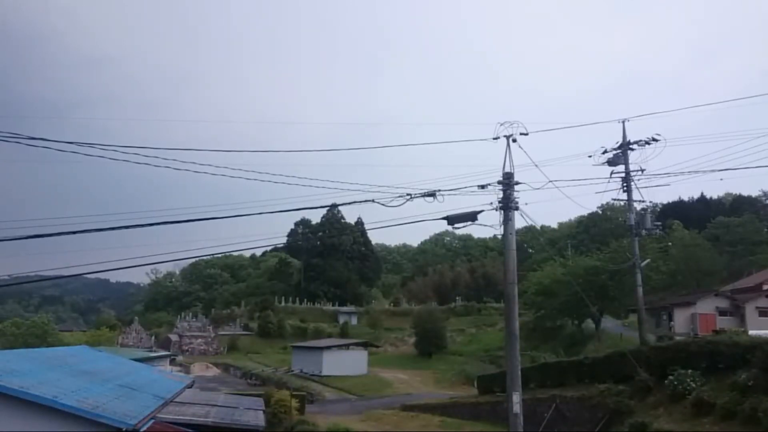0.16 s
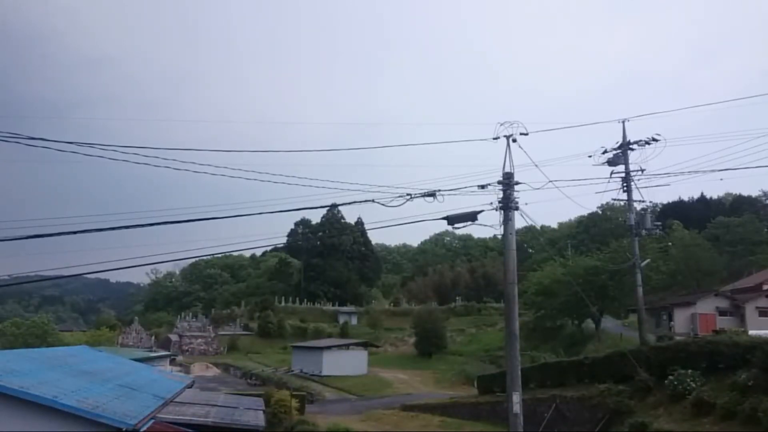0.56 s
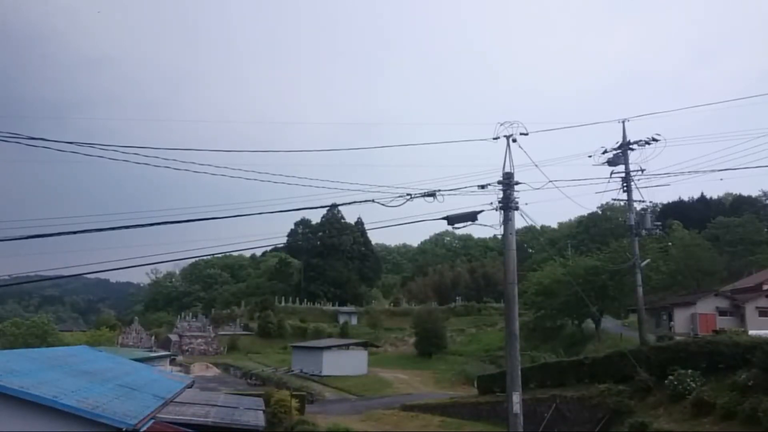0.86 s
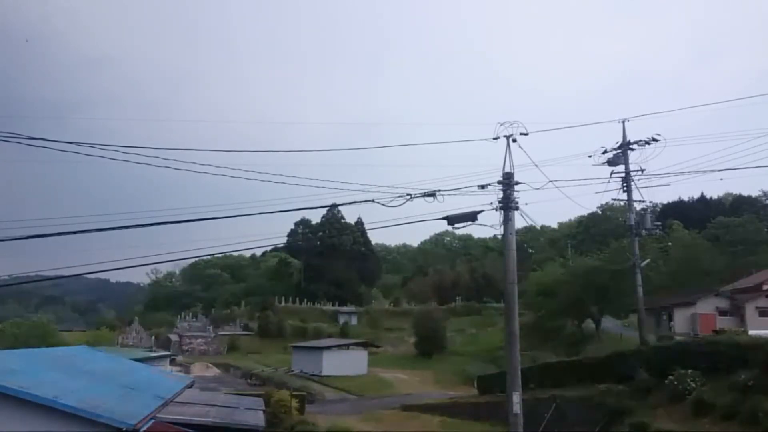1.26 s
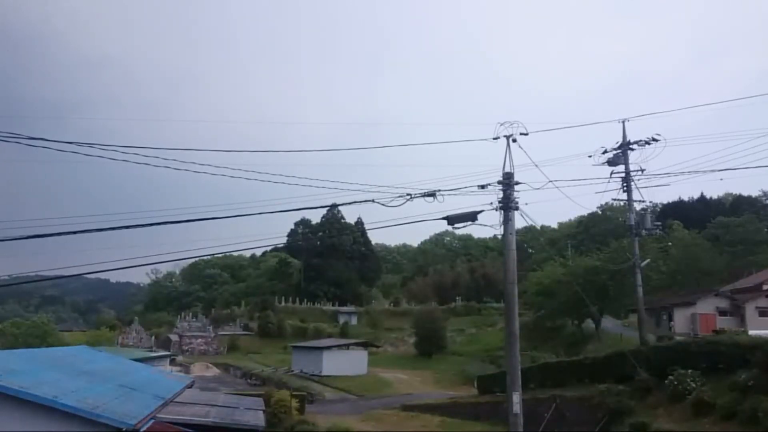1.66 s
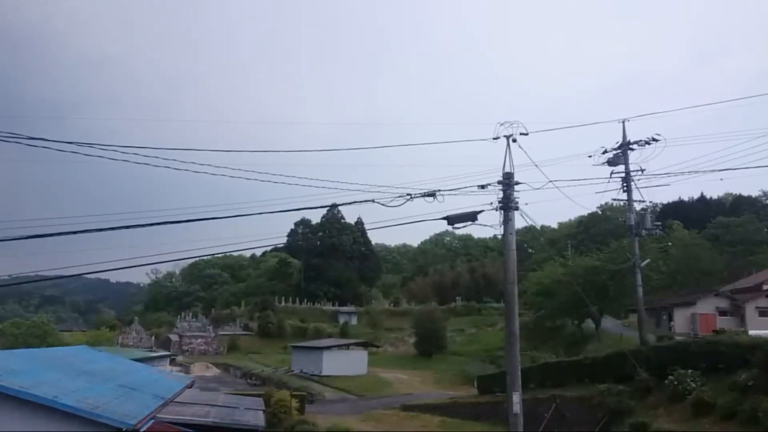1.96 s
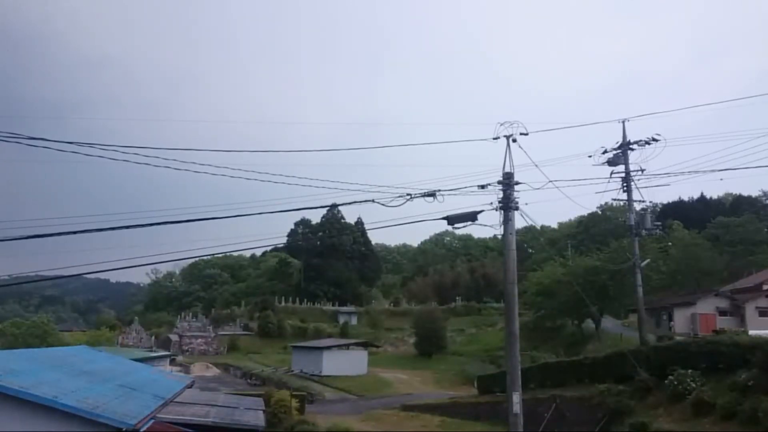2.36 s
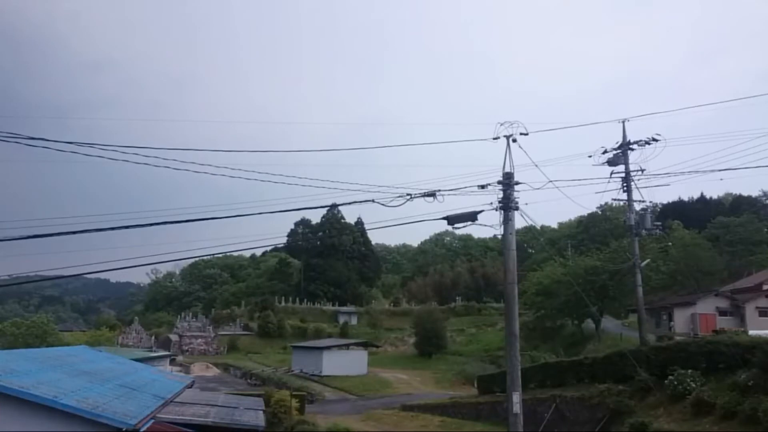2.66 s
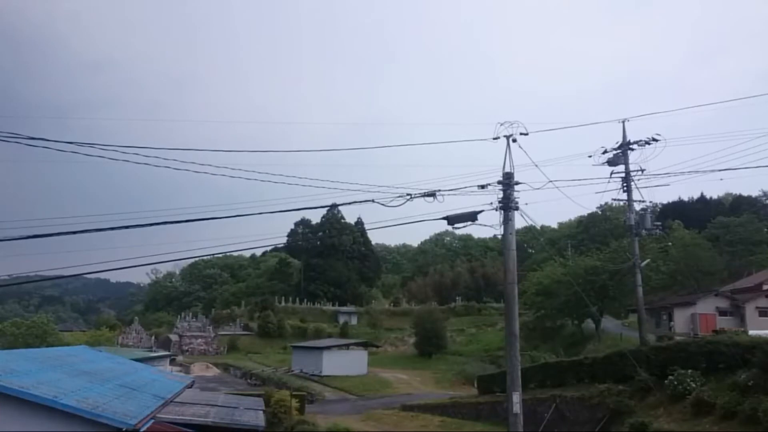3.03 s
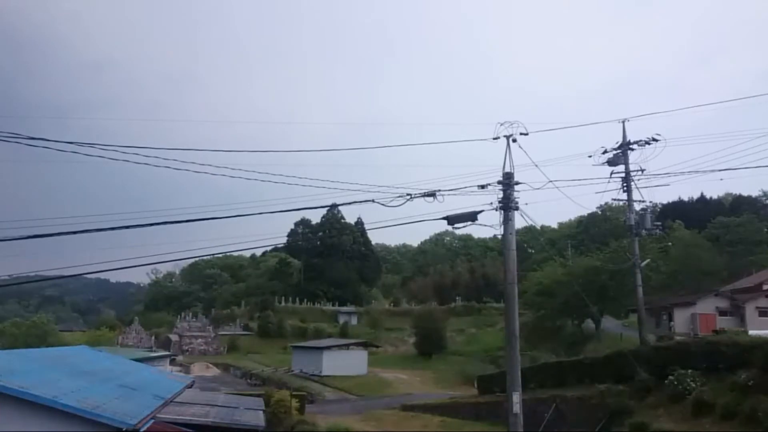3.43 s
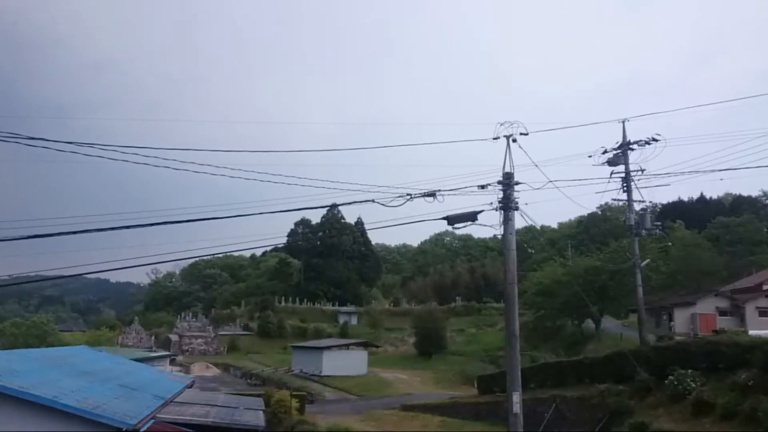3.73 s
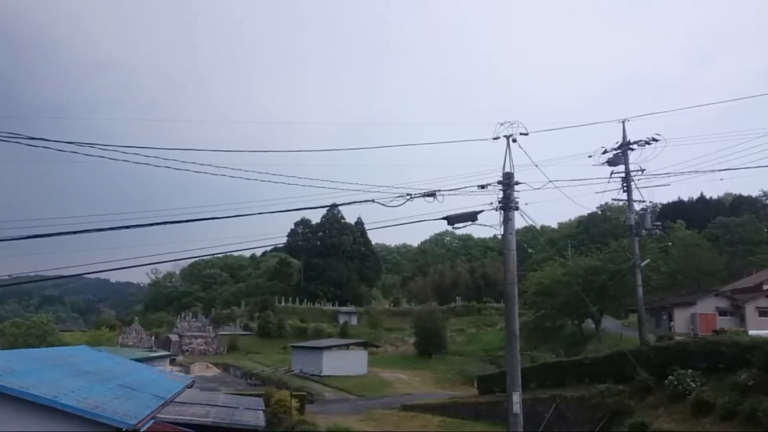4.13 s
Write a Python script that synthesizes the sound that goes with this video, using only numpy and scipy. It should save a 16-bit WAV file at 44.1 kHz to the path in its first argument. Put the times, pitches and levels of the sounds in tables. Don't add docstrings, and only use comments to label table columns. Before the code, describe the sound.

Still, nearly silent outdoor air opens the scene. At about 0.36 seconds thunder strikes abruptly: a hard, low-mid blast with a brief bright snap and a tiny buzzing rattle of something loose nearby. Uneven booms tumble on over a dense deep rumble, with another knock near 0.8, easing around 1.2. At 1.5 a second powerful burst hits, with crackling edges and crowded thuds until about 2.1, and another boom near 2.4. The roll then softens into muffled hill echoes, thinning after 3.3. A last, smaller surge arrives at 3.8 and fades until the abrupt end at about 4.3. Much quieter and close by, a sandal slides over grit, strongest near 1.5, squeaks faintly around 2.0 and 2.4 to 2.8, steps softly at 2.8, and crunches firmly twice with a stone tick around 3.8. No rain; mono phone sound, overloaded peaks gently held, little deepest bass.

```python
import sys
import numpy as np
from scipy import signal
from scipy.fft import rfft, irfft, next_fast_len
from scipy.io import wavfile
from scipy.ndimage import uniform_filter1d, minimum_filter1d

SR = 44100
rng = np.random.default_rng(int(sys.argv[2]) if len(sys.argv) > 2 else 0)


def ratio(d):
    e = np.asarray(d, float) / 20
    return 10 ** e


def transcribe(u):
    v = np.clip(np.atleast_2d(u).T, -1, 1)
    q = np.round(v * 32767).astype(np.int16)
    wavfile.write(sys.argv[1], SR, q)


N = 189365

# time in seconds, level in dB,
# nearness in dB (near segments sound brighter, far ones deeper).
ROLL_COURSE = [(0, -93, 5), (.24, -75, 14.5), (.27, -58.5, 22), (.31, -43.5, 9.5), (.36, -25.5, 3),
               (.6, -31.5, 1.5), (.97, -31, 3), (1.21, -36.5, 8), (1.51, -30, 1), (1.6, -27, 0),
               (2.05, -26, -1), (2.27, -30.5, 0.5), (2.8, -31.5, -1), (3.26, -28.5, 0), (3.34, -37, 2),
               (3.764, -42, 3), (3.781, -25.5, -3.5), (4.29, -37, 0)]


def rms_one(x):
    return x / np.sqrt(np.mean(x ** 2) + 1e-20)


def in_time(rows):
    s, *columns = np.transpose(rows)
    return [np.interp(np.arange(N) / SR, s, c) for c in columns]


def filtered(x, points):
    hz, level_db = np.transpose(points)
    size = next_fast_len(N + SR // 4)
    grid = np.maximum(np.fft.rfftfreq(size, 1 / SR), 1)
    response = ratio(np.interp(np.log(grid), np.log(hz), level_db))
    return irfft(rfft(x, size) * response, size)[..., :N]


def coloured(x, points):
    return rms_one(filtered(x, points))


def grains(per_s, spread_db):
    sizes = ratio(spread_db * np.minimum(rng.exponential(1, N), 4))
    signs = rng.choice([-1, 1], N)
    return sizes * signs * (rng.random(N) < per_s / SR)


def drift(rate):
    knots = rng.standard_normal(400)
    return np.interp(np.arange(N) / SR * rate, np.arange(400), knots)


def packets(rows, skew, fall):
    out = np.zeros(N)
    for s, level_db, hz, half_ms in rows:
        t = np.arange(-4 * half_ms, 6 * half_ms, 1000 / SR) / half_ms
        shape = np.exp(-.5 * (t / np.where(t < 0, 1 - skew, 1 + skew)) ** 2)
        cycles = hz * half_ms / 1000 * (t - fall * t ** 2 / 2)
        wave = ratio(level_db) * shape * np.sin(2 * np.pi * (cycles + rng.random()))
        at = round((s - half_ms / 250) * SR)
        out[at:at + len(t)] += wave[:N - at]
    return out


def bursts(rows):
    out = np.zeros(N)
    t = np.arange(SR // 4) / SR
    for s, level_db, hz, octaves, rise_ms, t60 in rows:
        edges = np.clip(hz * 2. ** (octaves * np.array([-.5, .5])), 20, 18000)
        band_pass = signal.butter(2, edges, "band", fs=SR, output="sos")
        band = rms_one(signal.sosfilt(band_pass, rng.laplace(size=len(t))))
        shape = (1 - np.exp(-(1000 * t / rise_ms) ** 2)) * ratio(-60 * t / t60)
        at = round(s * SR)
        out[at:at + len(t)] += (ratio(level_db) * band * shape / shape.max())[:N - at]
    return out


def thunder_booms():
    # time in seconds, peak in dB, pitch in Hz.
    kinks = [(0.365, -4.5, 196.3), (.376, -1.0, 249), (.388, -8, 268), (0.397, -10, 224.6),
             (0.477, -8.5, 207.5), (.551, -15, 160.5), (.681, -12, 227), (.797, -10, 174.6),
             (.854, -7.5, 214), (.934, -14, 148), (1.328, -13, 157), (1.354, -12, 149), (1.535, -2.5, 230),
             (1.552, -7.5, 208.4), (1.573, -9.5, 206.6), (1.631, -7, 230.5), (1.74, -5, 199),
             (1.842, -10.5, 167), (1.861, -10, 183.6), (1.88, -9.5, 182), (1.905, -8.5, 231.5),
             (1.941, -12, 265), (2.0, -8.5, 161.8), (2.013, -8.5, 202), (2.055, -14.5, 217),
             (2.116, -7.5, 191.6), (2.371, -10.5, 155.5), (2.383, -9.5, 249), (3.779, -11, 221),
             (3.928, -8.5, 256)]
    # time in seconds,
    # peak in dB, pitch in Hz.
    echoes = [(.359, -16.5, 293), (.37, -11, 425), (.398, -12, 433), (.444, -14, 278), (.546, -11.5, 374),
              (.82, -21, 205), (1.381, -15.5, 252), (1.96, -13, 213), (2.027, -15, 182),
              (2.324, -16.5, 198.4), (2.6, -20, 239), (2.649, -19, 231), (2.667, -16.5, 270),
              (2.7, -20, 245), (2.794, -17.5, 158), (2.819, -23, 183), (2.872, -14, 220),
              (2.899, -19.5, 256), (2.986, -21.5, 210), (2.999, -16, 170), (3.121, -17.5, 207.4),
              (3.169, -28, 228), (3.203, -20.5, 247), (3.239, -17.5, 198), (3.258, -19, 232),
              (3.424, -24, 110.5), (3.912, -12.5, 232), (4.026, -19.5, 199), (4.05, -20, 147),
              (4.076, -18.5, 148)]
    # time in seconds, peak in dB, pitch in Hz, half length in ms.
    long_booms = [(0.365, -15.5, 130.5, 18), (0.4, -9.5, 94.4, 15), (0.464, -14, 106.8, 8),
                  (0.53, -14, 89.7, 18), (.529, -10, 145.4, 8.3), (0.693, -16, 157.7, 7.5),
                  (0.828, -6.5, 133.3, 7.7), (1.369, -18, 136, 13), (1.538, -5, 129, 7.7),
                  (1.602, -15, 241.4, 16), (1.659, -10, 142.6, 9), (1.762, -14, 88.4, 26),
                  (1.924, -9, 170, 11), (2.02, -1.5, 94.4, 3.3), (2.075, -16, 106.2, 5),
                  (2.198, -15, 233, 9.8), (2.356, -8.5, 109.3, 6.8), (2.373, -14, 89.4, 12),
                  (2.444, -22.5, 99, 28), (2.674, -10, 107.3, 5.2), (2.879, -12, 88.9, 11),
                  (3.132, -9, 97, 8.5), (3.156, -18.5, 90, 7), (3.806, -24.5, 100.6, 8.3),
                  (3.809, -19.5, 163.4, 33), (3.845, -12.5, 131.8, 1.6), (3.888, -20, 105.6, 8),
                  (3.931, -20, 104, 11), (3.95, -13.5, 180, 15), (3.996, -16.5, 105.7, 8)]
    trains = [(s, db, hz, 1000 * 0.67 / hz) for s, db, hz in kinks]
    trains += [(s, db, hz, 1000 * 1 / hz) for s, db, hz in echoes]
    return packets(trains + long_booms, skew=0.059, fall=0.015)


def roll(booms):
    # frequency in Hz, density in dB per Hz.
    roll_colour = [(18, -51), (32, -27), (45, -11.5), (85, 4.5), (240, 1), (330, -10), (480, -18.5),
                   (580, -25), (700, -26.5), (1000, -34.5), (1300, -52), (1800, -70.5), (3000, -110)]
    split_hz = [110.5, 319]
    shocks = coloured(grains(per_s=5000, spread_db=0.26), roll_colour)
    deep, below_upper = [signal.sosfiltfilt(signal.butter(3, hz, fs=SR, output="sos"), shocks) for hz in split_hz]
    body, upper = below_upper - deep, shocks - below_upper
    near_boom = signal.lfilter([.002], [1, -.998], np.abs(booms))
    clumps_db = 0.97 * drift(24.994)
    level_db, near_db = in_time(ROLL_COURSE)
    out = np.zeros(N)
    # range, its level in dB, its share of the nearness, its thickening at booms
    for part, part_db, near_share, thicken in ((deep, 0, -1.2, 3.5), (body, 1.1, 0.01, 4.5), (upper, -6.5, 1, 7.0)):
        course_db = level_db + part_db + near_share * near_db + clumps_db + 0.63 * drift(17)
        out += ratio(course_db) * rms_one(part) * (1 + thicken * near_boom)
    return out


def cracks():
    # time in seconds, peak in dB, t60 in seconds.
    fronts = [(0.27, -37.5, 0.11), (0.36, -15, 0.034), (0.484, -43.5, 0.065), (0.788, -60.5, 0.083),
              (0.824, -31.5, 0.14), (0.922, -45, 0.071), (1.393, -42.5, 0.057), (1.528, -21.5, 0.09),
              (1.6, -41, 0.087), (1.913, -22, 0.047), (2.15, -33.5, 0.12), (2.607, -44, 0.071),
              (3.774, -41, 0.064), (3.906, -42, 0.08), (4.108, -55, 0.08)]
    snap = [(s, db - 15, 680, 1.3, 1.5, 1.3 * t60) for s, db, t60 in fronts]
    edge = [(s, db - 33.5, 1600, .48, 2.5, 0.34 * t60) for s, db, t60 in fronts]
    tail = [(s, db - 39.5, 1550, .6, 12, 11.0 * t60) for s, db, t60 in fronts]
    return bursts(snap) + bursts(edge) + bursts(tail)


def loose_part():
    # time in seconds, peak in dB, pitch in Hz, half length in ms.
    buzzes = [
        (.357, -61, 6030, 0.94),
        (.3615, -63.5, 5900, 0.46),
        (.3645, -55, 6000, 0.99),
        (.3645, -75, 11900, 1.2),
        (.367, -57.5, 4100, 1.2),
        (.3635, -48.5, 2680, 1.6),
    ]
    return packets(buzzes, skew=0, fall=0)


def sliding_sole():
    # time in seconds, pressure as hiss level in dB.
    slide_course = [(0, -118), (.29, -89), (.45, -82.5), (.6, -76.5), (.72, -70), (.97, -73.5),
                    (1.08, -74.5), (1.2, -72.5), (1.33, -66), (1.55, -61.5), (1.9, -65.5), (2.05, -68),
                    (2.75, -70.5), (2.92, -77), (3.44, -78.5), (3.7, -81.5), (3.94, -73), (4.29, -104)]
    # frequency in Hz, density in dB per Hz.
    low_colour = [(760, -27.5), (1300, -6), (2380, -7.5), (2650, -10.5), (3130, -11.5), (4500, -18),
                  (5850, -54), (9900, -120)]
    # frequency in Hz, density in dB per Hz.
    high_colour = [(2650, -40), (4500, -7.5), (5300, -1.5), (6000, 3.5), (6400, 1.5), (7000, 3.5),
                   (8700, -2), (11000, -11), (16000, -27)]
    # frequency in Hz, density in dB per Hz.
    top_colour = [(6000, -26.5), (9500, -4.5), (12000, -4), (14000, -7), (16000, -7)]
    pressure_db, = in_time(slide_course)
    roll_db, _ = in_time(ROLL_COURSE)
    above_firm_db = pressure_db + 65
    low = ratio(-66 + 0.41 * above_firm_db) + ratio(roll_db - 44.5)
    top = ratio(-82.5 + 1.4 * above_firm_db) + ratio(-101)
    hiss = np.zeros(N)
    for gain, colour in ((low, low_colour), (ratio(pressure_db), high_colour), (top, top_colour)):
        hiss += gain * ratio(1.3 * drift(25)) * coloured(grains(per_s=4900, spread_db=-1.5), colour)
    return hiss


def footfalls():
    # time in seconds, peak in dB, rise in ms, t60 in seconds, pitch factor.
    falls = [
        (2.825, -48.5, 5.7, .2, 1.15),
        (3.78, -45, 5.4, 0.26, .97),
        (3.849, -45.5, 1.2, 0.17, 1.08),
    ]
    # centre in Hz, width in octaves, level in dB.
    crunch = [(2210, 0.49, -3), (1510, 1, -2.5), (2830, 0.88, -6.5), (4200, .6, -10), (6530, 1.0, -11)]
    return bursts([(s, db + part_db, hz * pitch, octaves, rise_ms, t60)
                   for s, db, rise_ms, t60, pitch in falls for hz, octaves, part_db in crunch])


def stones_and_brushes():
    # time in seconds, peak in dB, centre in Hz, rise in ms, t60 in seconds.
    stones = [(.632, -59.5, 2700, 18, 0.26), (.665, -69, 2690, 15, 0.13), (.78, -61, 3000, 6, .12),
              (2.8, -60, 6040, 24, .2), (2.9, -65, 6370, 2, 0.089), (3.388, -64.5, 3930, 3, .09),
              (3.48, -73, 8000, 3.7, .11), (3.495, -65, 4000, 4, .084), (3.575, -66.5, 3600, 3, .12),
              (3.847, -43, 6170, 0.86, 0.03), (3.848, -42, 2730, 1.1, 0.042),
              (3.954, -51.5, 6000, 0.6, 0.01), (4.032, -60.5, 2180, 2.7, 0.073)]
    # time in seconds, peak in dB, centre in Hz, rise in ms, t60 in seconds.
    brushes = [
        (.62, -67.5, 3110, 30, .3),
        (0.632, -66, 6300, 33, 0.24),
        (.82, -60, 1750, 22, .5),
        (1.021, -66, 6800, 36, .4),
        (1.02, -79, 12550, 45, 0.35),
        (1.27, -82.5, 12700, 56, .7),
    ]
    rows = [(s, db, hz, octaves, rise_ms, t60) for touches, octaves in ((stones, 0.43), (brushes, 0.82))
            for s, db, hz, rise_ms, t60 in touches]
    return bursts(rows)


def rubber_squeaks():
    # time in seconds, peak in dB, pitch in Hz, t60 in seconds.
    squeaks = [(2.418, -73, 7300, .15), (2.452, -75, 7840, .15), (2.503, -62, 6800, 0.075),
               (2.537, -70, 7650, .1), (2.555, -80, 7000, .15), (2.593, -73.5, 7600, .08),
               (2.62, -73, 7700, .1), (2.635, -69, 7800, .08), (2.7, -70, 7500, .1),
               (2.723, -67.5, 7600, 0.36), (2.755, -73, 7500, 0.17), (1.9, -71, 2600, 0.55),
               (1.989, -71, 2600, 0.37), (2.055, -66, 2610, .4), (2.435, -65.5, 2600, 0.13),
               (2.489, -71.5, 2600, 0.68), (2.58, -75, 2600, .15)]
    return bursts([(s, db, hz, .09, 48 * t60, t60) for s, db, hz, t60 in squeaks])


def still_air():
    # frequency in Hz, density in dB per Hz.
    air_colour = [(30, -8), (70, -2), (300, -4), (860, -5.5), (1400, -13), (2800, -15), (5000, -18),
                  (9000, -32.5), (12000, -43.5), (16000, -40.5)]
    return ratio(-64) * coloured(rng.standard_normal(N), air_colour)


def scene():
    booms = thunder_booms()
    thunder = booms + roll(booms) + cracks() + loose_part()
    sandal = sliding_sole() + footfalls() + stones_and_brushes() + rubber_squeaks()
    return (thunder + sandal + still_air())[None]


def roll_off(x):
    return signal.sosfilt(signal.butter(12, 15720, fs=SR, output="sos"), x)


def record(dry):
    # frequency in Hz, gain in dB.
    microphone = [(20, -43), (40, -1), (8900, -3), (10200, -10), (16000, -8.5)]
    fade_s, limit = .004, .95
    fade = np.sin(np.pi / 2 * np.minimum(np.arange(N)[::-1] / SR / fade_s, 1)) ** 2
    heard = filtered(dry * fade, microphone)
    room_left = np.minimum(1, limit / (np.abs(heard) + 1e-9))
    held = minimum_filter1d(room_left, size=441)
    gain = uniform_filter1d(uniform_filter1d(held, size=220), size=220)
    return roll_off(heard * gain)


dry = scene()
out = record(dry)
transcribe(out)
```